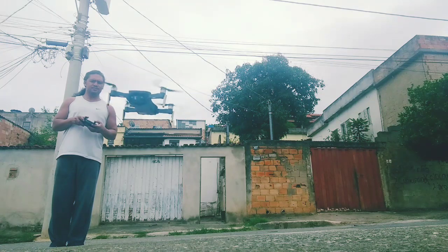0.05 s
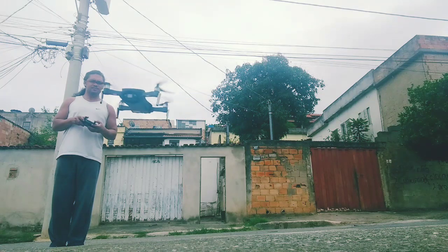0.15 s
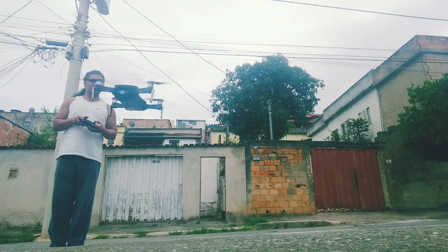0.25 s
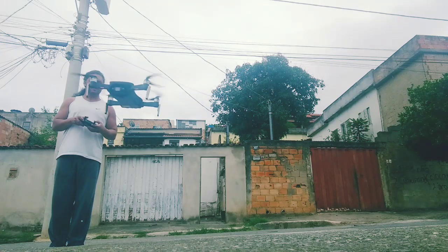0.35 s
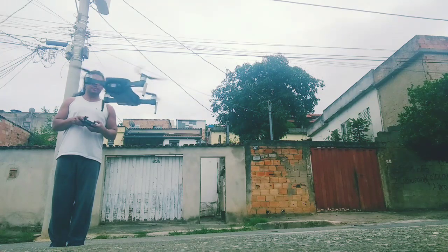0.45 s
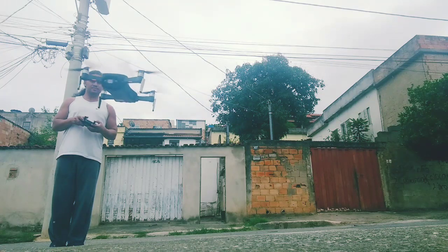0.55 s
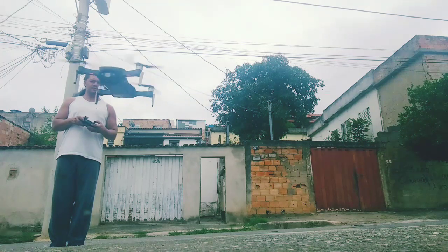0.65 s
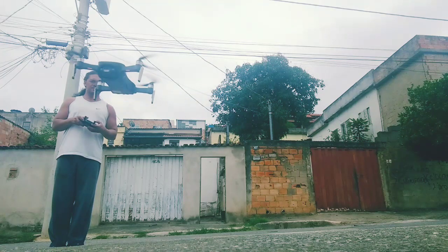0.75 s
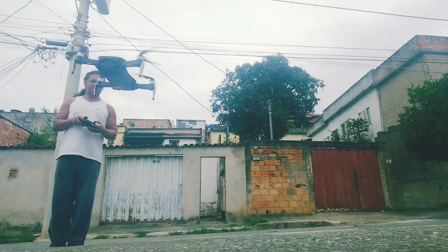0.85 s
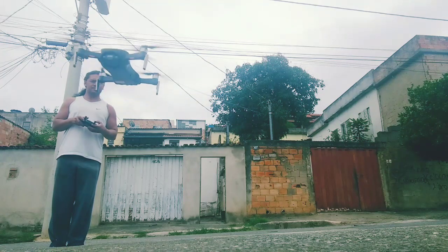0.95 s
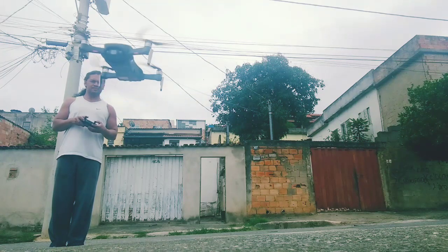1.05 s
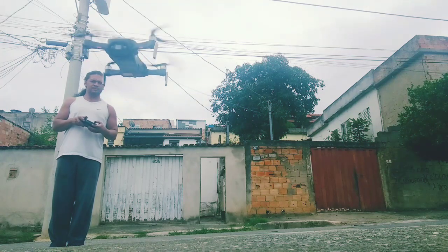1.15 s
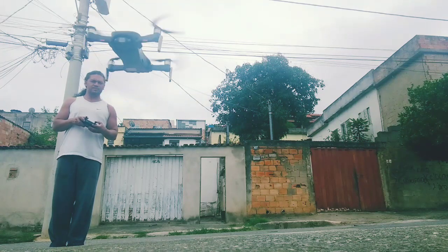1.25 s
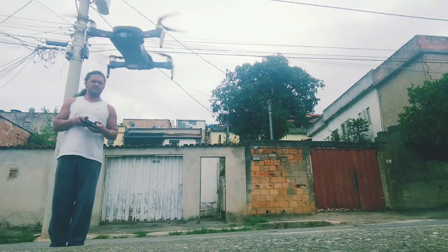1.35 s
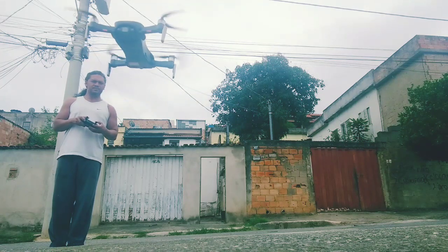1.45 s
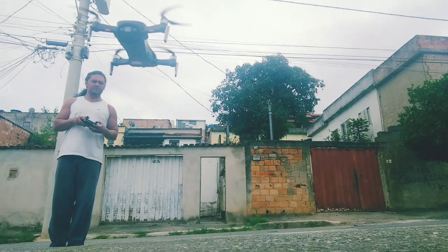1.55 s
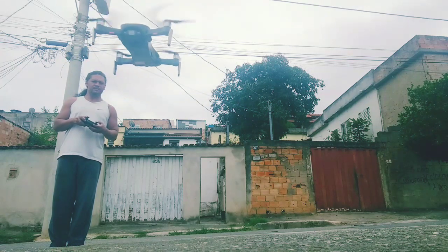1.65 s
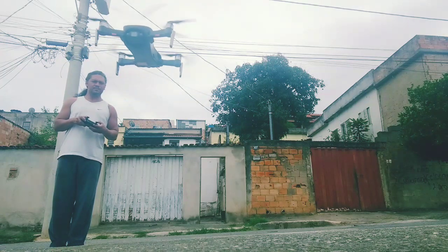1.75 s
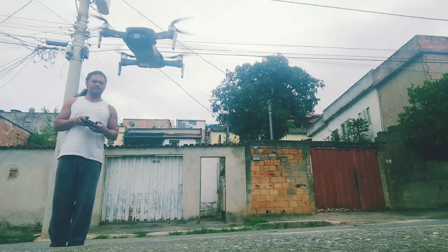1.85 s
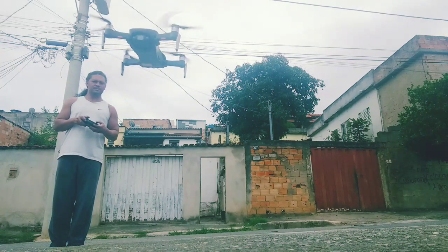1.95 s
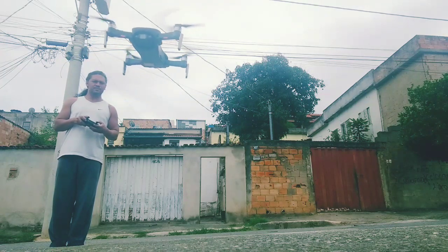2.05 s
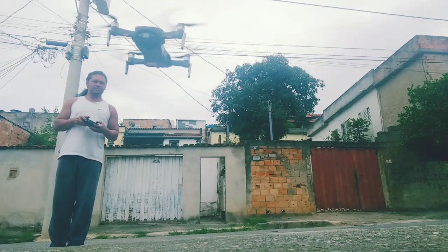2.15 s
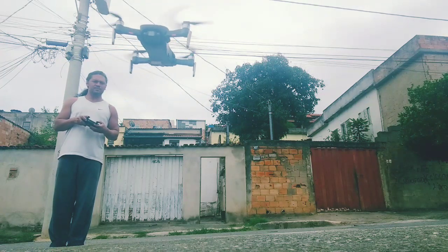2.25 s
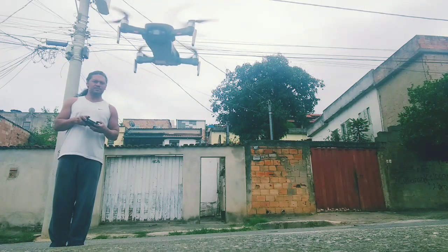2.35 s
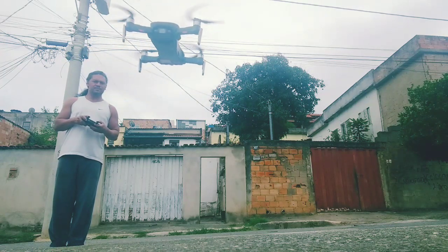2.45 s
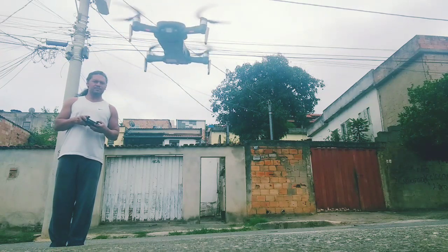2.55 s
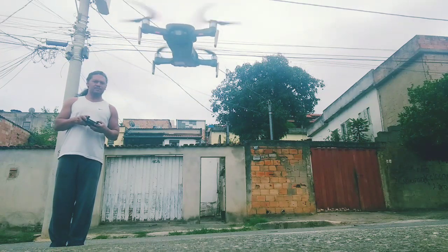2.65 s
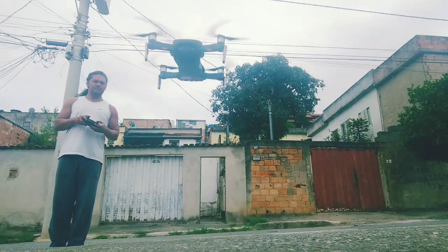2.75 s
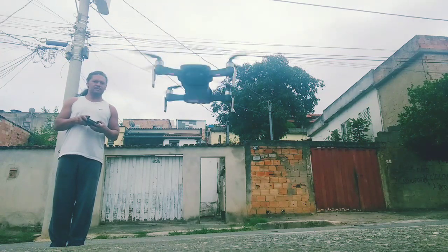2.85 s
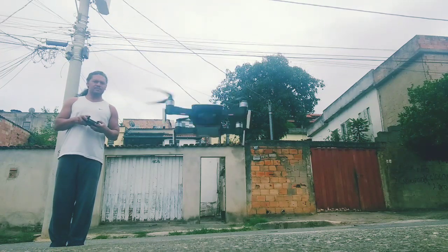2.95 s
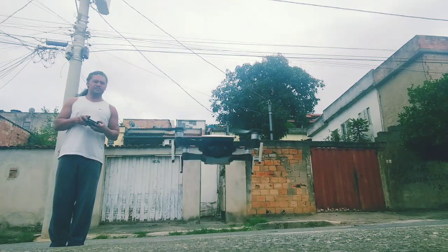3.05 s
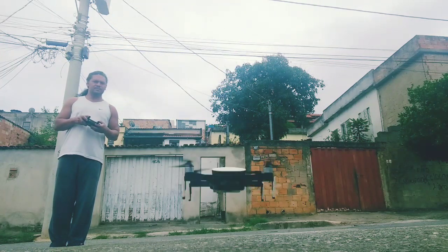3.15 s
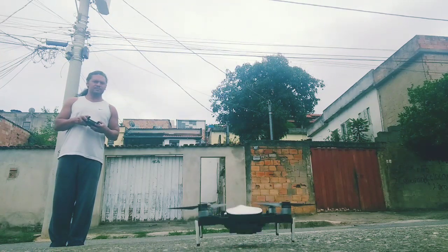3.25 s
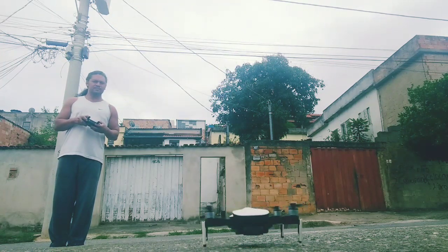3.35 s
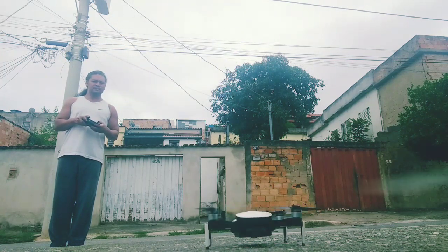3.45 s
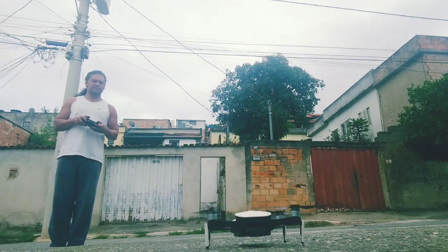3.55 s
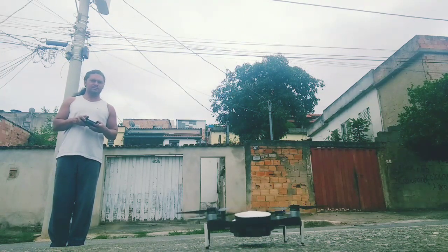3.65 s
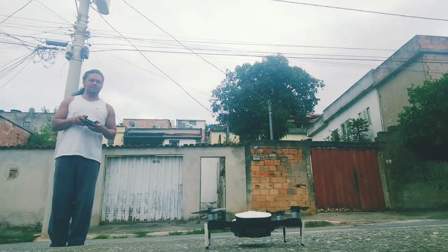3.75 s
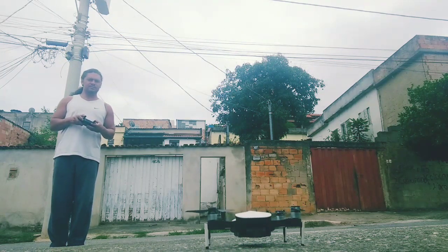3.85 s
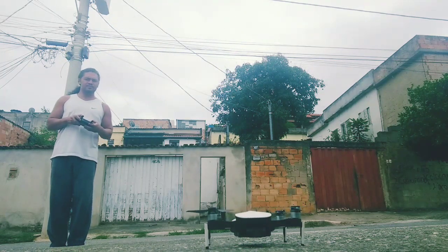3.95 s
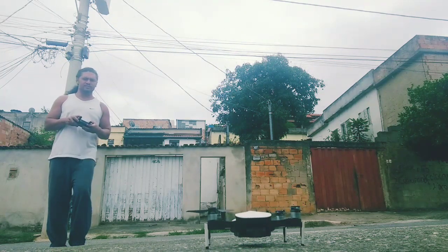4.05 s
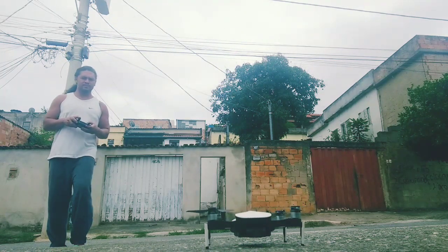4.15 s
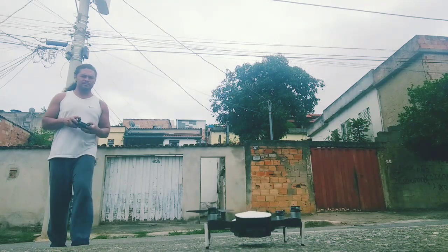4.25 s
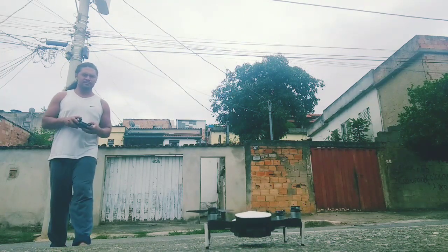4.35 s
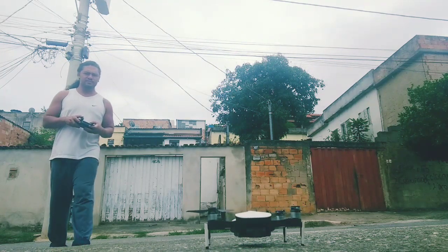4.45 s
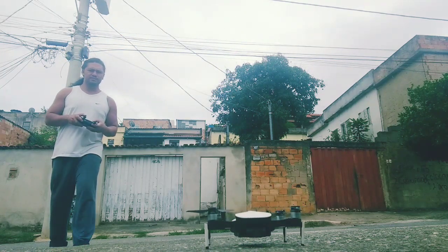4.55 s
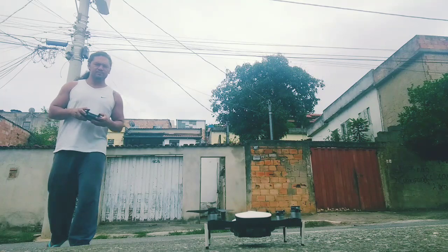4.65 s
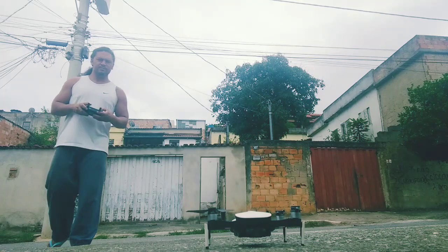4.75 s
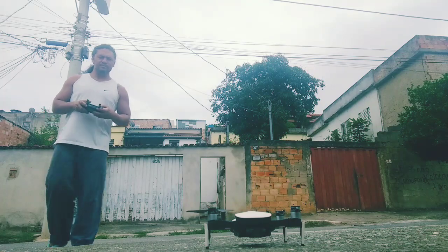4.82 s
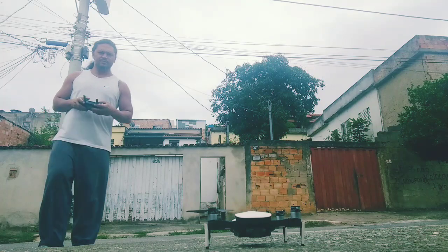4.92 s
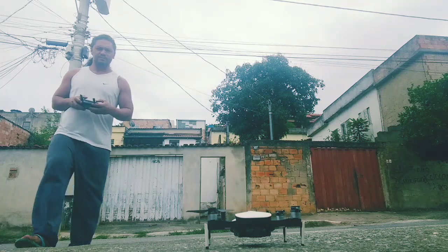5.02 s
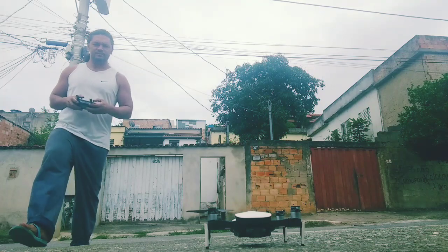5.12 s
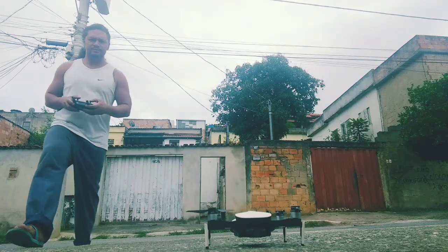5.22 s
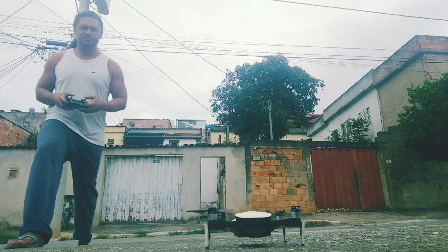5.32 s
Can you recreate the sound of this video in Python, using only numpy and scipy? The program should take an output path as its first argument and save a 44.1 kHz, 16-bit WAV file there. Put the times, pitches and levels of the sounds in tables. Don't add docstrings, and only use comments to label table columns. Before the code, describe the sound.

Outdoors on a street, a small drone hovers very near a phone microphone: buzzing, high whine, airy hiss and gusty wind pops. Its pitch dips as it drops, the legs crunch on gravel, and the motors cut with a small puff and squeak. Then the quiet opens up: a far bird repeating a whistle, leaves, insects, faint steps and a nearing car.

```python
import sys
import numpy as np
from scipy import signal
from scipy.fft import rfft, irfft, next_fast_len
from scipy.io import wavfile
from scipy.ndimage import uniform_filter1d, minimum_filter1d, map_coordinates

SR = 44100
rng = np.random.default_rng(int(sys.argv[2]) if len(sys.argv) > 2 else 0)


def boost(x):
    u = np.asarray(x, float) / 20
    return 10 ** u


def master(y):
    cut = np.clip(np.atleast_2d(y).T, -1, 1)
    pcm = np.round(cut * 32767)
    wavfile.write(sys.argv[1], SR, pcm.astype(np.int16))


N = 237346
T = np.arange(N) / SR
SMOOTH_DB = 0.8
STOP_S = 3.728


def unit(x):
    return x / np.sqrt(np.mean(x ** 2) + 1e-20)


def along(points, hz):
    f, v = np.transpose(points)
    return np.interp(np.log(hz + 1), np.log(f + 1), v, left=-120, right=-120)


def curves(rows, before=None, after=None):
    s, *cols = np.transpose(rows)
    return [np.interp(T, s, c, before, after) for c in cols]


def wobble(rate):
    knots = rng.standard_normal(int(N * rate / SR) + 4)
    return map_coordinates(knots, [T * rate])


def filtered(x, response):
    m = next_fast_len(N + 8192)
    return irfft(rfft(x, m) * response(np.fft.rfftfreq(m, 1 / SR)), m)[..., :N]


def shaped(points):
    return lambda hz: boost(along(points, hz))


def peaks(modes):
    return lambda hz: sum(boost(db) / np.sqrt(w) / (1 + ((hz - c) / w) ** 2) for c, w, db in modes)


def ports(direct, lag_ms, tilt_db):
    side = np.array([[1], [-1]]) / 2
    return filtered(direct, lambda hz: boost(tilt_db * side) * np.exp(-2j * np.pi * hz * lag_ms / 1000 * side))


def rush(gain, alike, lag_ms, tilt_db, patchy_db):
    z = signal.stft(rng.standard_normal((3, N)), nperseg=512)[2]
    field = uniform_filter1d(rng.standard_normal(z.shape[1:]), 6, 0)
    field = uniform_filter1d(field, 10, 1)
    patchy = signal.istft(z * boost(patchy_db * unit(field)), nperseg=512)[1][:, :N]
    noise = filtered(patchy, gain)
    alike = np.clip(alike, 0, 1)
    own = noise[1:] * boost(tilt_db * np.array([[.5], [-.5]]))
    return unit(np.sqrt(alike) * ports(noise[0], lag_ms, tilt_db) + np.sqrt(1 - alike) * own)


# (time [s], speed [share of hover])
THROTTLE = [(0, 1), (2.64, 1), (2.69, .865), (2.73, .775), (2.8, .85), (2.9, .965), (3.0, 1), (3.37, .975),
            (3.44, .78), (3.52, .705), (3.6, .735), (3.76, .74)]


def throttle():
    return uniform_filter1d(curves(THROTTLE)[0], SR // 40)


# (time [s], aloft [0-1])
HEIGHT = [
    (0, 1),
    (2.7, 1),
    (3.3, 0),
    (5.38, 0),
]


def height():
    return curves(HEIGHT)[0]


# (time [s], pitch trim [%], roll trim [%])
ATTITUDE = [(0, .6, .3), (.15, .3, 1.3), (.6, .4, .6), (.76, -.2, -2.2), (.92, .9, .8), (1.12, .3, .2),
            (1.22, -1.2, -2), (1.33, 1.5, -1), (1.43, -1.4, 1.4), (1.56, 4, -2.6), (1.68, -1.2, .6),
            (1.8, 1.4, .9), (2.01, -2.1, .6), (2.15, -.3, -.3), (2.64, -.4, -.4), (3.05, 0, -1.6),
            (3.22, -1.4, -4.5), (3.4, -.4, -5.5)]
# (multiple, front [dB], rear [dB], loaded [dB])
BLADE = [(1, -4.5, 10, 4.5), (2, -2.5, 4, 6.5), (3, -6.5, 5.5, -5), (4, -7, -5.5, -17), (5, -10, -10, -40),
         (6, -9, -1.5, -41), (7, -12, -12, -45), (8, -106, -12, -69), (9, -8.5, -95, -28),
         (10, -17, -1, -30), (11, -7.5, -31, -34), (12, -9.5, -16, -15), (13, -31, -5, -23),
         (14, -11, -2, -25), (15, -10.5, -5, -27), (16, -13.5, -5, -27), (17, -27, -1.5, -25)]
# (multiple, front [dB], rear [dB], loaded [dB])
WHINE = [(18, -1.5, -2, 4)]


def rotor(shaft, levels, index, slip_hz, flutter_db, fade_db):
    hover_hz, pitch_share, roll_share = shaft
    blade_db, whine_db, low_whine_db = levels
    aloft, speed = height(), throttle()
    pitch, roll = [uniform_filter1d(c, SR // 20) for c in curves(ATTITUDE)]

    idle_share, lift_share = 0.74, 0.95
    lifting = np.clip((speed - idle_share) / (lift_share - idle_share), 0, 1)
    base_hz = SHAFTS[0][0]
    full_hz = base_hz + (hover_hz - base_hz) * (1 - (1 - lifting) * (1 - aloft))
    hz = full_hz * speed * (1 + (pitch_share * pitch + roll_share * roll) / 100)

    torque_db = 5 * np.clip(np.gradient(speed) * SR, -.8, 1.5)
    standing = T > 3.52
    decades = np.log10(speed)
    blade_db = blade_db + 30 * decades + fade_db * wobble(7.05)
    whine_db = aloft * whine_db + (1 - aloft) * low_whine_db + 70 * decades
    whine_db = whine_db + torque_db + 4 * standing + fade_db * wobble(6.96)
    running = np.clip((STOP_S - T) / 0.015, 0, 1)
    phase = 2 * np.pi * np.cumsum(hz + slip_hz * wobble(20)) / SR
    flutter = [boost(flutter_db * wobble(29.66)) for _ in range(4)]

    def stack(table):
        total = 0
        for k, row in enumerate(table):
            if row[index] > -39:
                total = total + boost(row[index]) * flutter[k % 4] * np.sin(round(row[0]) * phase + k * k)
        return total

    slack = np.clip(1 - hz / 350, 0, 1)
    overtones = boost(-7 * (1 - aloft) - 45 * slack) * stack(BLADE[4:])
    blades = stack(BLADE[:2]) + boost(-25 * slack) * stack(BLADE[2:4]) + overtones
    return running * (boost(blade_db - 8) * blades + boost(whine_db + 1.5) * stack(WHINE)), phase


# (hover blade passes [Hz], pitch trim [share], roll trim [share])
SHAFTS = [
    (356, 1, 0),
    (361, 0, 1),
    (383, -.9, 0),
    (359.5, .75, -.2),
]
# (blade tone [dB], motor whine aloft [dB], motor whine near the ground [dB])
ROTORS = [
    (-28, -32.5, -29),
    (-30.5, -40, -31),
    (-34, -44, -35),
    (-40, -40, -28),
]


def rotor_tones():
    front, a = rotor(SHAFTS[0], ROTORS[0], index=1, slip_hz=1.1, flutter_db=2.5, fade_db=1.5)
    rear, b = rotor(SHAFTS[1], ROTORS[1], index=2, slip_hz=1.3, flutter_db=3.0, fade_db=1.5)
    loaded, c = rotor(SHAFTS[2], ROTORS[2], index=3, slip_hz=1.1, flutter_db=2.5, fade_db=2.5)
    twin, _ = rotor(SHAFTS[3], ROTORS[3], index=1, slip_hz=0.583, flutter_db=0.5, fade_db=3.5)
    aloft = height()
    above = ports(front, 0.19, -4.0) + ports(rear, 0.131, -3.5)
    above = above + ports(loaded, 0.12, -0.99) + ports(twin, 0.12, -19.0)
    low = boost(-4.0) * ports(front + rear + loaded + twin, 0.038, -1.7)
    chop = unit(1 + 0.058 * (np.sin(a) + np.sin(b) + np.sin(c)))
    return aloft * above + (1 - aloft) * low, chop


# (frequency [Hz], level [dB per Hz])
TIP = [(5000, -20), (6200, -1), (7500, -1), (9500, -6), (14300, -7)]


def tip_hiss(gust_db):
    level_db = -35.5 + 43 * np.log10(throttle()) - 3.5 * (1 - height()) ** 2
    return boost(level_db + 5 + gust_db) * rush(shaped(TIP), 0.22, 0.33, -5.5, SMOOTH_DB)


SWISH_DB = -31
# (frequency [Hz], level [dB per Hz])
SWISH = [(1300, -72), (1700, 8.5), (2500, -7), (3300, 10.5), (4000, 17.5), (5000, 18), (6000, 12.5),
         (7000, -33)]
# (frequency [Hz], level [dB per Hz])
LOW_SWISH = [(1300, 5), (1700, 3), (2500, 4.5), (3300, 6), (4200, 6.5), (5200, 6.5), (6000, -3), (7000, 2)]


def blade_swish(gust_db):
    aloft = height()
    level_db = SWISH_DB + 36 * np.log10(throttle()) + 5 * (1 - aloft) ** 4
    drift_from_s, drift_to_s = 0.9, 1.5
    past = np.clip((T - drift_from_s) / (drift_to_s - drift_from_s), 0, 1)
    early = rush(shaped(SWISH), 0.53, 0.25, -2.4, SMOOTH_DB)
    late = rush(shaped(SWISH), 0.28, 0.18, -3.2, SMOOTH_DB)
    overhead = np.sqrt(1 - past) * early + np.sqrt(past) * late
    grounded = rush(shaped(LOW_SWISH), 0.75, 0.033, -11.0, SMOOTH_DB)
    return boost(level_db - 5 + gust_db) * (np.sqrt(aloft) * overhead + np.sqrt(1 - aloft) * grounded)


# (time [s], level [dB])
DOWNWASH = [(0, -25.5), (.09, -15.5), (.3, -21), (.44, -9.5), (.55, -21.5), (.68, -15), (1.35, -9),
            (1.92, -14.5), (2.05, -10), (2.45, -14), (2.6, -9.5), (2.73, -19.5), (3.06, -8), (3.15, -14),
            (3.3, -5.5), (3.6, -37), (3.72, -24.5), (4.23, -57)]


def downwash_level():
    return curves(DOWNWASH, after=-120)[0]


# (frequency [Hz], level [dB per Hz])
WASH = [(150, 10), (300, 15), (600, 5), (1000, 0), (1400, 1.5), (1900, -58)]


def wash():
    aloft = height()
    level_db = -34.5 + 0.73 * (downwash_level() + 11) + 6 * (1 - aloft)
    high = rush(shaped(WASH), 0.4, 0.13, -1.8, SMOOTH_DB)
    low = rush(shaped(WASH), 0.71, 0.026, -1.1, SMOOTH_DB)
    return boost(level_db + 0.5 + 3.6 * wobble(24)) * (aloft * high + (1 - aloft) * low)


def drone():
    tones, chop = rotor_tones()
    turning = boost(-350 * np.clip(T - STOP_S, 0, 1))
    brake = boost(-42 - SWISH_DB) * np.exp(-((T - 3.8) / .024) ** 2)
    gust_db = 1.2 * wobble(6.82) + 0.48 * wobble(29.87)
    air = tip_hiss(gust_db) + blade_swish(gust_db)
    return tones + (turning + brake) * chop * air + turning * wash()


def eddies(rows, slow_s, slow_hz, gain_db):
    pops = np.zeros(N + SR)
    t = np.arange(-1200, 1200) / SR
    turns = rng.uniform(0, 2 * np.pi, (len(rows), 1))
    for (s, db, edge_db), turn in zip(rows, turns):
        push = np.exp(-(t / slow_s) ** 2) * np.cos(2 * np.pi * slow_hz * t + turn)
        edge = boost(edge_db - 5) * np.exp(-(t / 0.0011) ** 2) * np.cos(2 * np.pi * 750 * t + turn)
        pops[round(s * SR) - 1120:][:len(t)] += boost(db + gain_db) * (push + edge)
    return pops[:N]


# (frequency [Hz], level [dB per Hz])
BUFFET = [(15, -50), (25, -46), (40, -3), (65, -0.5), (110, 2), (200, -4), (400, -16), (800, -28.5),
          (1500, -31.5), (3000, -104)]
# (time [s], peak [dB], sharp edge [dB])
POPS = [(0.139, -30, -12), (0.234, -19, -16), (0.975, -12, -26), (1.084, -6, -11), (1.143, -13.5, -19),
        (1.192, -5, -10), (1.26, -11, 2), (1.293, -8.5, -11), (1.327, -11, 3), (1.442, -11, -24),
        (1.473, -7, -28), (1.588, -6, -10), (1.743, -10, -9), (1.778, -10, -1), (1.864, -7, -15),
        (1.999, -11, -16), (2.042, -13.5, -3), (2.305, -6.5, -19), (2.41, -9, 0), (2.525, -11.5, -11),
        (2.58, -2, -25), (2.662, -11, -28), (2.818, -24, 5), (2.926, -10, -18), (2.977, -8.5, -18),
        (3.063, -6, -1.5), (3.224, -20, 8), (3.279, -8.5, -1), (3.357, -18.5, 6), (3.507, -16.5, -35)]
# (time [s], peak [dB], sharp edge [dB])
THUMPS = [(0.251, 0, -14), (0.439, 1.5, -16), (0.492, -8, -17), (0.664, -10.5, -8), (0.747, -13, -14),
          (0.83, -9.5, -20), (3.513, -5.5, -33), (3.677, -40, -4.5), (3.718, -13, -24), (3.735, -17, -36),
          (3.752, -21, -36), (3.782, -23, -36), (3.823, -17.5, -33), (3.87, -21, -36), (3.92, -22, -36)]


def downwash():
    lumps = boost(np.array([5.65 * wobble(45) + 3.7 * wobble(110) for port in range(2)]))
    buffet = unit(lumps * rush(shaped(BUFFET), 0, 0, -11, patchy_db=1.5))
    pops = eddies(POPS, 0.001, 300, gain_db=5.5) + eddies(THUMPS, 0.0028, 120, gain_db=3)
    return boost(downwash_level() - 0.7) * buffet + pops * boost([[-14], [0]])


# (time [s], peak [dB], decay t60 [s])
KNOCKS = [
    (0.657, -16, 0.025),
    (3.3584, -17, 0.013),
    (3.5168, -15, 0.032),
    (3.6087, -20, 0.022),
    (4.46, -44, 0.11),
    (4.9362, -46, 0.17),
    (5.2794, -47, 0.49),
]
# (frequency [Hz], level [dB per Hz])
GRIT = [(200, -20), (1200, -4), (4000, 0), (8000, -5), (14300, -9)]


def gravel():
    env = np.zeros(N)
    for s, db, t60 in KNOCKS:
        attack = np.clip((T - s) / (0.02 * t60), 0, 1)
        env += attack * boost(db - 5.5 - 60 * np.clip(T - s, 0, 1) / t60)
    crunch = env * rush(shaped(GRIT), 1.0, 0.029, 0.0, SMOOTH_DB)
    u = T - 3.79
    squeak = boost(-34 + 3 * wobble(150)) * np.exp(-(u / 0.0082) ** 2)
    squeak = squeak * np.sin(2 * np.pi * (4500 * u - 3000 * u * u))
    ring = boost(-58 + 3 * wobble(25)) * np.exp(-((u - .17) / .11) ** 2) * np.sin(2 * np.pi * 4450 * u)
    return crunch + ports(squeak + ring, 0.023, -0.58)


# (time [s], level [dB])
CAR = [(3.8, -8), (4.05, -0.5), (4.3, 3), (4.7, 4.5), (5.05, 9), (5.38, 10.5)]
# (frequency [Hz], width [Hz], level [dB])
ENGINE = [(89.8, 3.4, 10), (120, 23, 4.5), (180.3, 4.2, -0.5), (257, 18, -3.5), (346, 3.8, -9)]
# (frequency [Hz], level [dB per Hz])
TRAFFIC = [(20, -7), (45, 12), (100, -1.5), (300, 3.5), (700, -4), (1200, -9.5), (2000, -12.5), (2800, -28),
           (3300, -61)]
# (frequency [Hz], level [dB per Hz])
LEAVES = [(1200, -34), (2000, -3), (2800, -2), (3700, -0.5), (5000, -2), (6000, -9.5), (8000, -16),
          (11000, -24), (14300, -28)]
# (frequency [Hz], width [Hz], level [dB])
INSECTS = [(3900, 25, -4), (4450, 25, -5), (5000, 30, 0), (6450, 30, -7), (7100, 25, -13)]


def street():
    near_db, = curves(CAR)
    engine = boost(-41.5 + near_db) * rush(peaks(ENGINE), 1.0, -0.15, 0.57, patchy_db=-2.0)
    tyres = boost(-46 + 0.56 * near_db) * rush(shaped(TRAFFIC), 0.58, -0.21, 0.51, patchy_db=1.5)
    leaves = boost(-53) * rush(shaped(LEAVES), 0.25, 0.041, -3.5, patchy_db=3.0)
    insects = boost(-61 + 2 * wobble(6)) * rush(peaks(INSECTS), .5, .03, -3, patchy_db=4)
    return engine + tyres + leaves + insects


# (time [s], whistle [Hz], whistle level [dB], chip level [dB])
BIRD = [(3.832, 1550, -59, -55), (3.968, 1564, -52, -54), (4.122, 1565, -51, -53), (4.26, 1555, -52, -55),
        (4.419, 1530, -49, -57), (4.57, 1564, -49.5, -56), (4.721, 1555, -63, -63)]


def bird():
    song = np.zeros(N)
    for s, hz, db, chip_db in BIRD:
        u = T - s
        glide_hz = hz + 330 * np.exp(-np.clip(u, 0, 1) / .009)
        chip = boost(chip_db) * np.exp(-(u / .008) ** 2)
        whistle = boost(db) * np.exp(-((u - .055) / 0.023) ** 2)
        song += (chip + whistle) * np.sin(2 * np.pi * np.cumsum(glide_hz) / SR)
    walls = rng.standard_normal((2, SR // 3)) * boost(-60 * T[:SR // 3] / 0.58)
    echo = signal.fftconvolve(song[None], walls / np.linalg.norm(walls[0]), axes=1)[:, :N]
    return ports(song, -.03, 2.5) + boost(-3) * echo


def scene():
    return drone() + downwash() + gravel() + street() + bird()


# (time [s], gain [dB])
GAIN = [(0, -0.5), (.14, 0.5), (.24, 2), (.27, -4), (.4, -0.5), (.44, -3.5), (.66, 0.5), (.86, 2),
        (1.1, -1), (1.4, .5), (2.05, .5), (2.12, -1), (2.9, 1), (3.12, -0.5), (3.36, 1.5), (4.03, 0.5),
        (4.95, 9), (5.38, 6)]


def gain_control(x):
    return x * boost(curves(GAIN)[0])


# (frequency [Hz], level [dB])
CROSSFEED = [(1, 1), (3500, -4.5), (6000, -8), (9000, -15.5), (22050, -30)]


def widen(x):
    late = filtered(x[::-1], lambda hz: boost(along(CROSSFEED, hz)) * np.exp(-2j * np.pi * hz / 2480))
    return filtered(x - late, lambda hz: hz < 14500)


def limit(x):
    need = np.minimum(1, .98 / (np.abs(x).max(axis=0) + 1e-9))
    return x * uniform_filter1d(minimum_filter1d(need, size=400), size=400)


def low_pass(x):
    return signal.sosfilt(signal.butter(12, 15440, fs=SR, output="sos"), x)


def record(dry):
    mix = limit(widen(gain_control(dry)))
    return low_pass(mix)


dry = scene()
out = record(dry)
master(out)
```